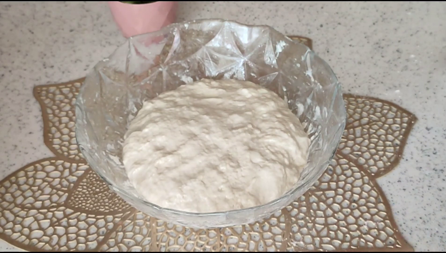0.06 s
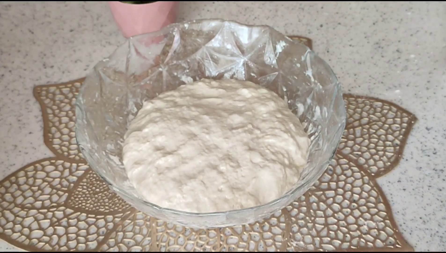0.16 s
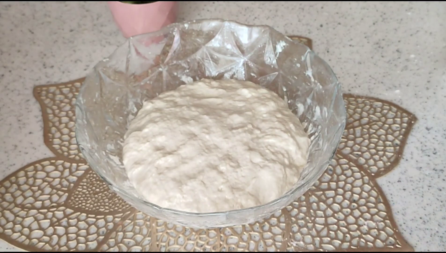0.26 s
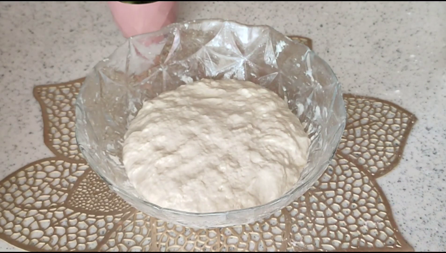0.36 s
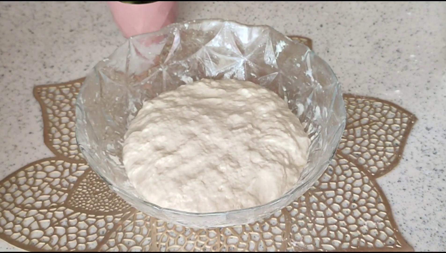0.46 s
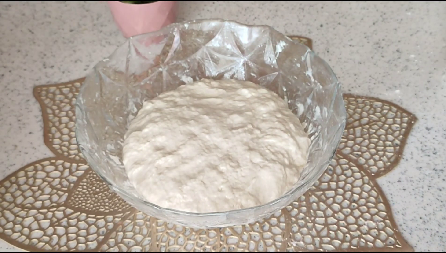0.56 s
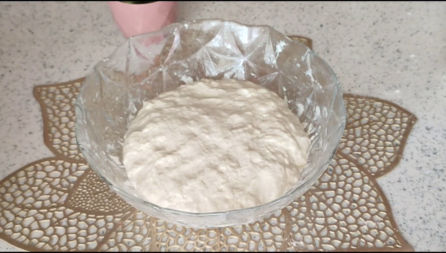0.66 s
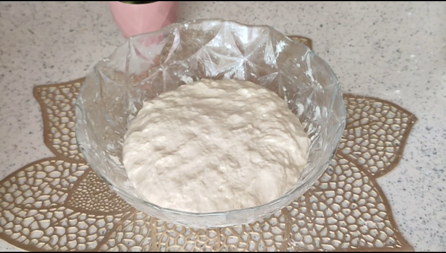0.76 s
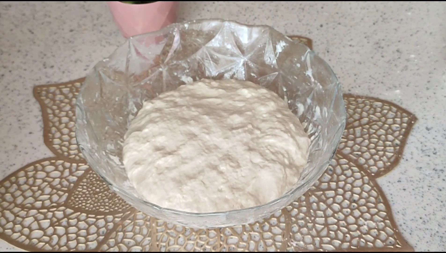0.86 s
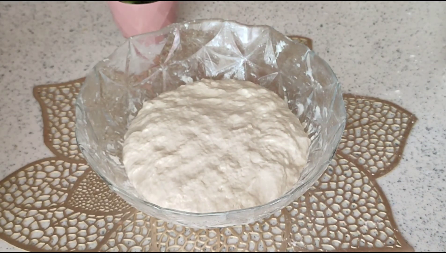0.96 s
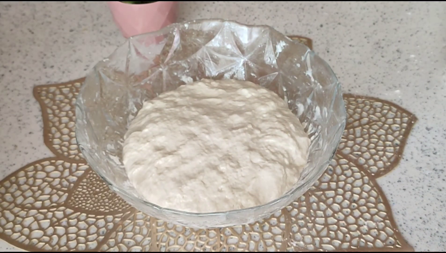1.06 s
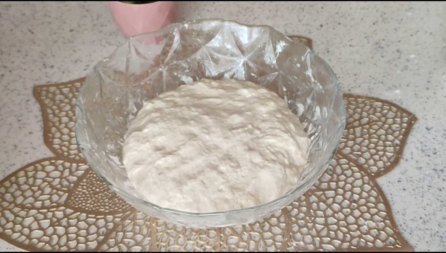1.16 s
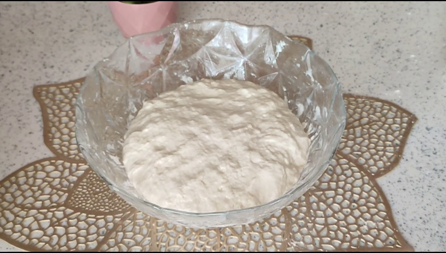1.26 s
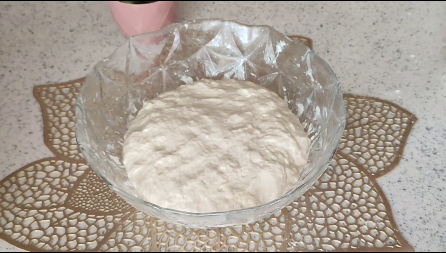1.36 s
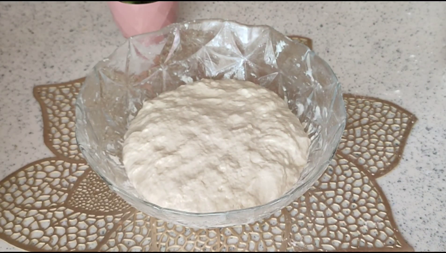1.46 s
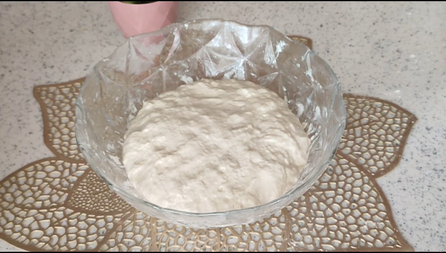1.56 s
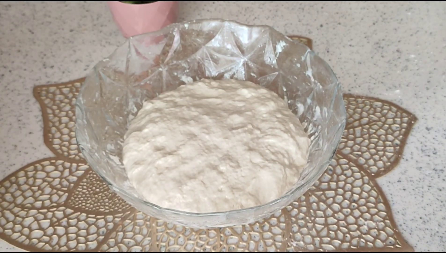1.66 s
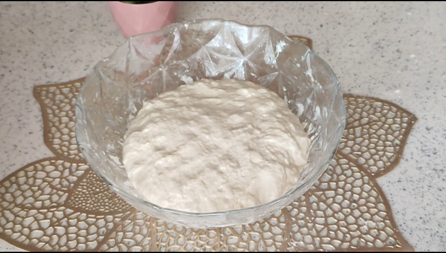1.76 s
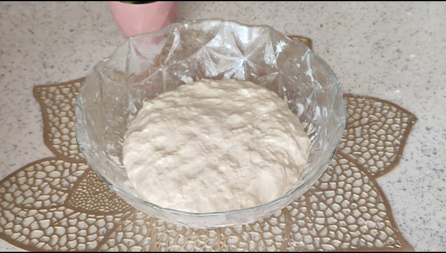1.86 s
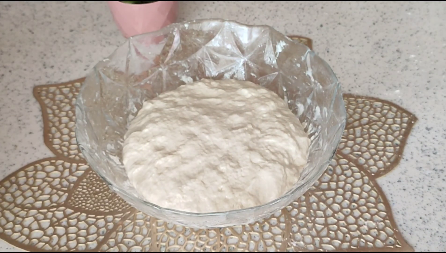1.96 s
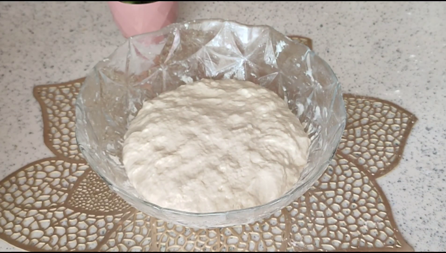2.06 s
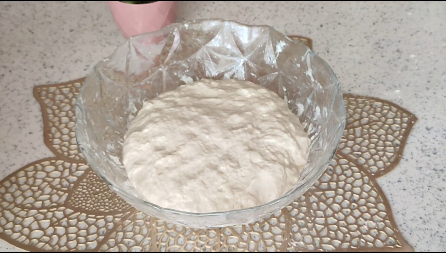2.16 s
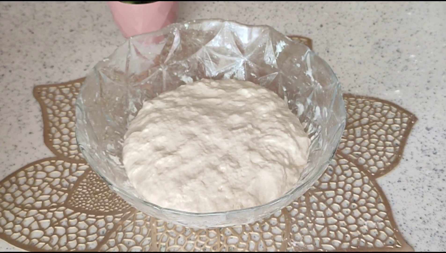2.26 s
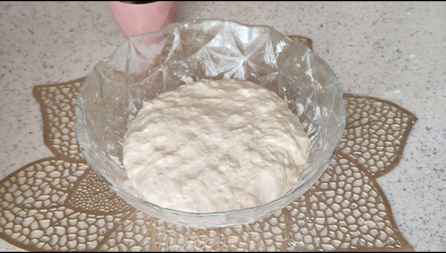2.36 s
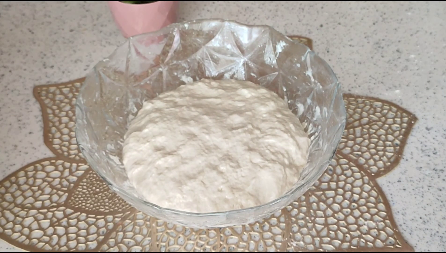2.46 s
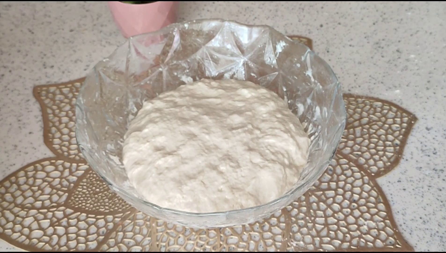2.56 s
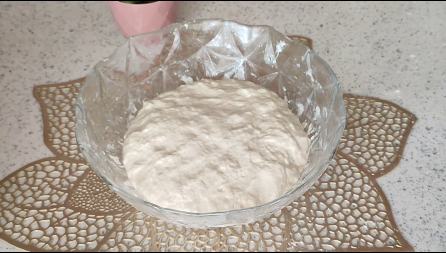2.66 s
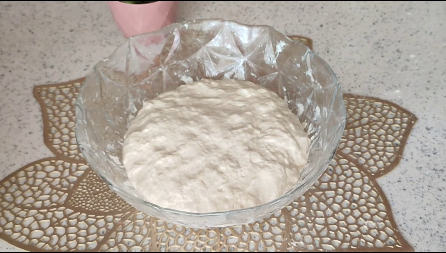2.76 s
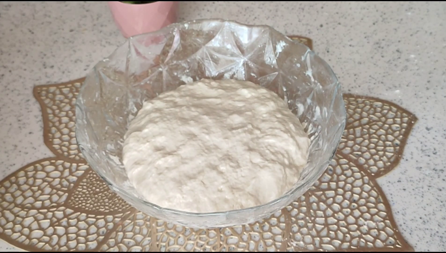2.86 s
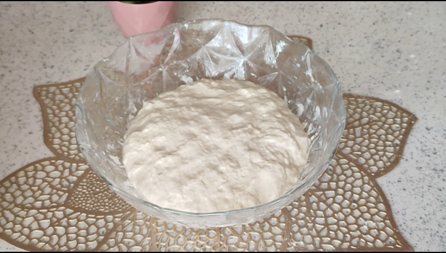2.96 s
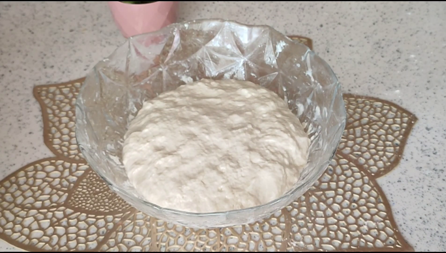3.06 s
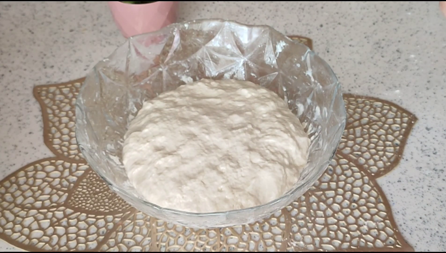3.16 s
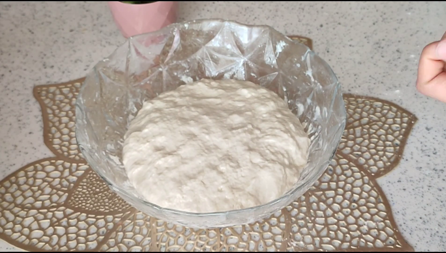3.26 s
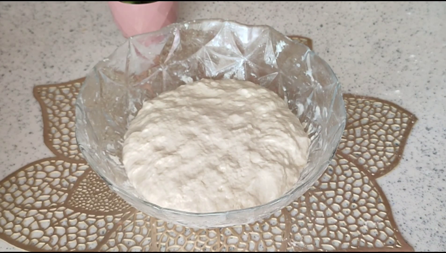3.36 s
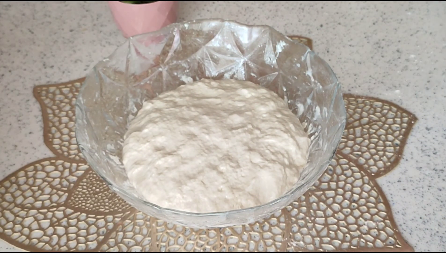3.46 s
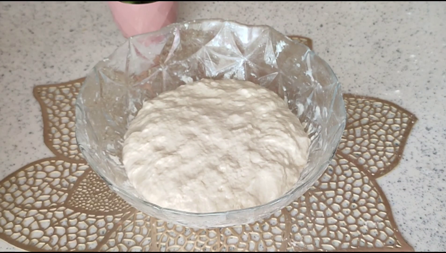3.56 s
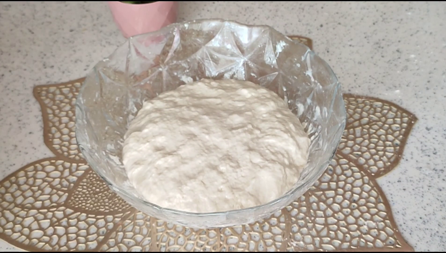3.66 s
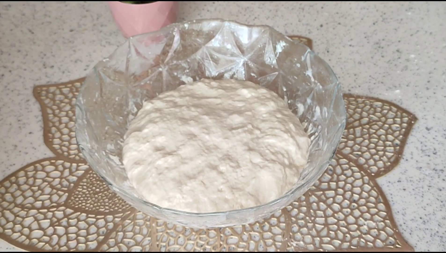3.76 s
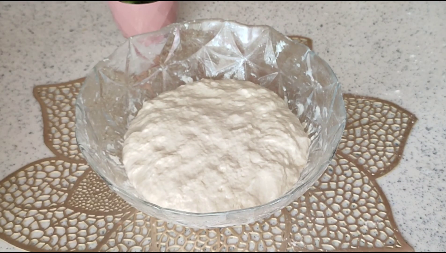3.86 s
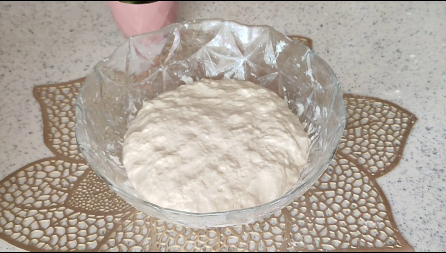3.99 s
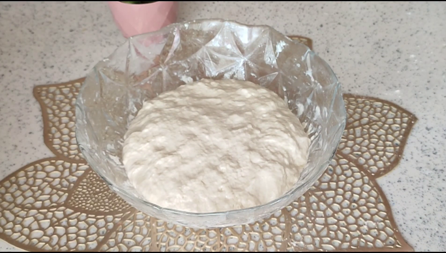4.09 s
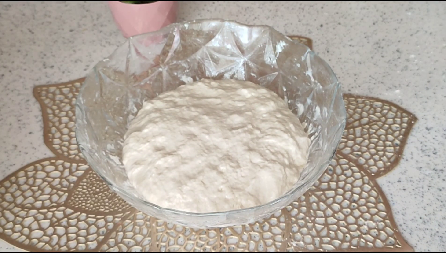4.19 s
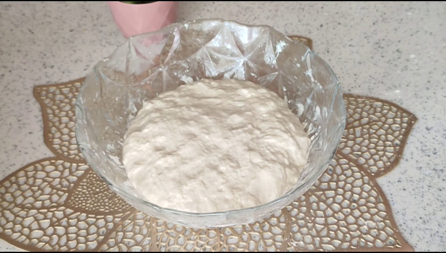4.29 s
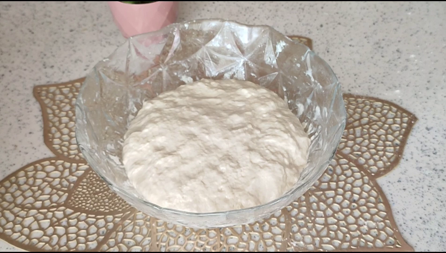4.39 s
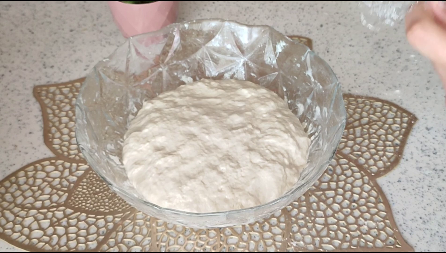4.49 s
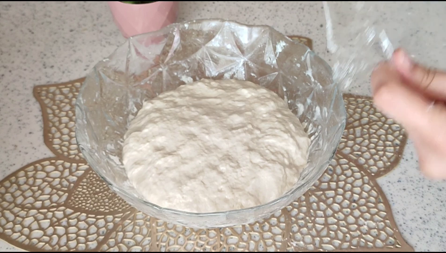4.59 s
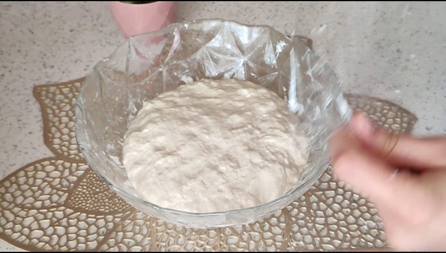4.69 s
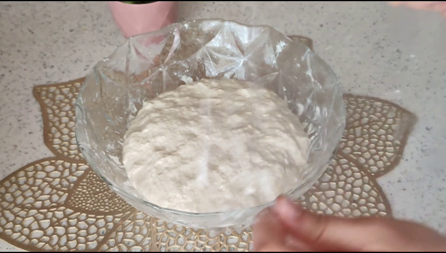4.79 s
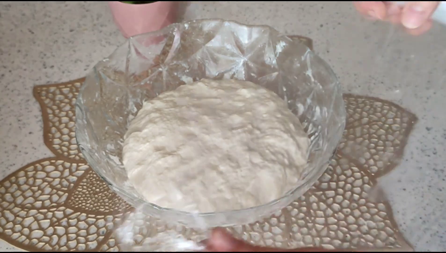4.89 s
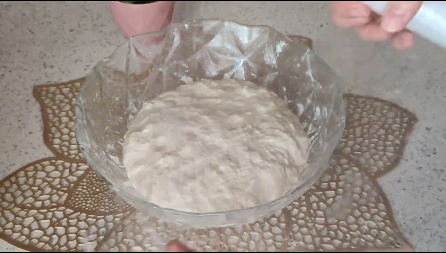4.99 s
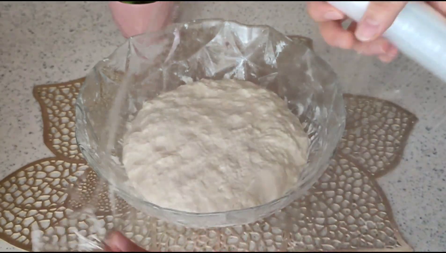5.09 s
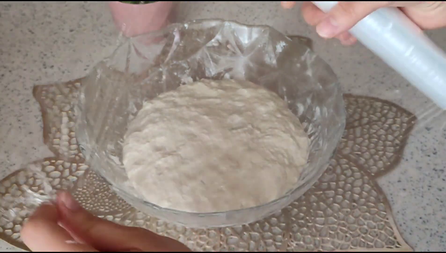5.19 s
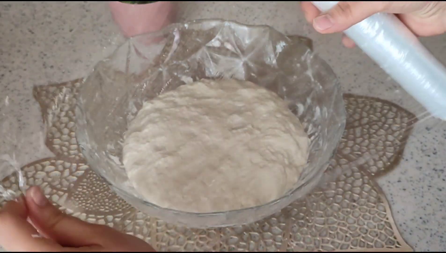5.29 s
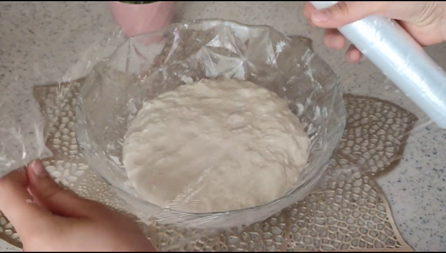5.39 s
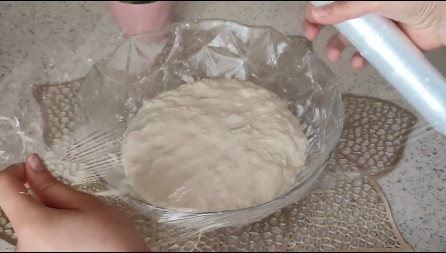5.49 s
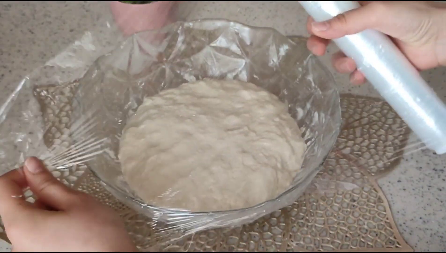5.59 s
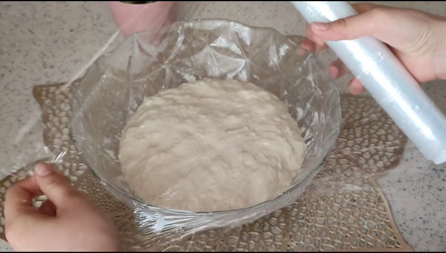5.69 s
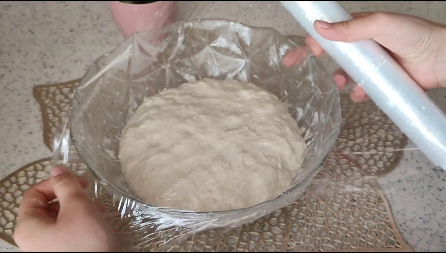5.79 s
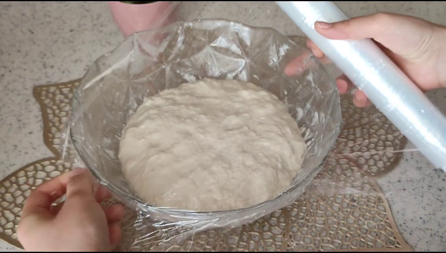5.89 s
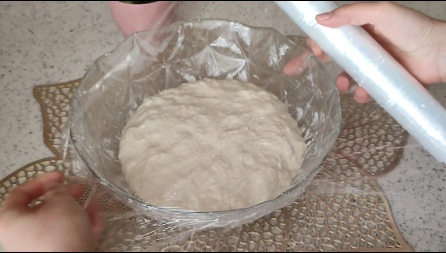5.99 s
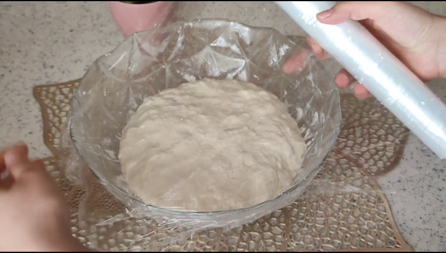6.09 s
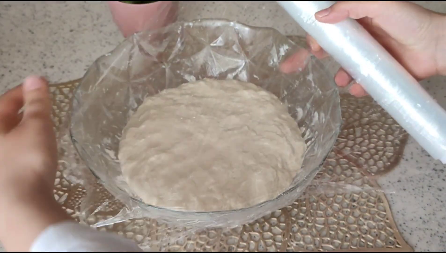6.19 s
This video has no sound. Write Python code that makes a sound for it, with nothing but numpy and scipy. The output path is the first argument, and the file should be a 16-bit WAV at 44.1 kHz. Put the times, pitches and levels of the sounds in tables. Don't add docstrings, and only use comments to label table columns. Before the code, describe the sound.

Cling film is faintly picked at, then peeled off its roll in loud crackling jerks with pops and low flaps in a quiet kitchen.

```python
import sys
import numpy as np
from scipy import signal
from scipy.io import wavfile
from scipy.ndimage import uniform_filter1d

SR = 44100
rng = np.random.default_rng(int(sys.argv[2]) if len(sys.argv) > 2 else 0)


def log_audio(samples):
    frames = np.atleast_2d(samples).T
    limited = np.clip(frames, -1, 1)
    pcm = np.round(limited * 32767).astype(np.int16)
    wavfile.write(sys.argv[1], SR, pcm)


def ratio(d):
    e = np.asarray(d, float) / 20
    return 10 ** e


N = 274962

# f/Hz, density/dB per Hz
AIR = [(8.8, -23), (15, 5), (28, -7), (48, -2.5), (70, -14.5), (104, -1), (126, -33), (167, -13.5),
       (203, -9.5), (234, -17), (499, -24), (719, -27.5), (1220, -33.5), (1760, -33), (5720, -44.5),
       (10300, -48.5), (12200, -74), (15900, -100), (22000, -120)]
# f/Hz, correlation/1
AIR_LIKENESS = [(60, 0.85), (170, 0.88), (500, 0.46), (1430, 0.14), (4130, 0.42), (11900, 0.088)]
# f/Hz, width/Hz, level/dB
HUM = [(165.1, 6.7, -64.5), (705, 19, -79)]
# f/Hz, level/dB, t60/s
BOWL = [(350, 10, .03), (900, 5, .13), (2420, 2, .11), (3400, 0, .04), (4400, 7, .1), (5650, 1, .11),
        (6800, 1, .035)]
# t/s, f/Hz, level/dB
SQUEAK = [
    (.17, 1420, -85),
    (.18, 1413, -58),
    (.2, 1464, -66),
    (.217, 1590, -59),
    (.25, 1640, -68),
    (.28, 1740, -68),
    (.31, 1770, -71),
    (.36, 1840, -78),
    (.4, 1790, -88),
]
# t/s, peak/dB, f/Hz, low knock/dB, left over right/dB
SNAPS = [(0.2925, -48.5, 3160, -7, 0.5), (0.4914, -36, 6400, -33, -7), (0.9175, -42.5, 6700, -27, -2),
         (0.9652, -41.5, 6250, -27, -5), (1.138, -46, 6820, -27, -7), (1.2006, -36, 6300, -41, -9),
         (1.252, -42, 5500, -30, -3), (1.2603, -43, 6040, -33, -5), (1.2866, -39, 5940, -30, -14),
         (1.7677, -45, 2780, -14, -5), (1.8712, -32, 7260, -18, -6), (2.0498, -56, 7460, -25, -5),
         (2.4854, -35, 4110, -14, -6), (3.0929, -50, 6900, -20, -6), (3.1224, -44, 6730, -20, -6),
         (3.143, -35, 2430, -16, -8), (3.2258, -32.5, 7900, -16, -8), (3.262, -48, 5000, -10, -5),
         (3.277, -31, 9000, -15, -7), (3.2788, -32, 4400, -16, -8), (3.3023, -28, 7180, -27, -12),
         (3.3076, -24, 7750, -13.5, -1), (3.5998, -44, 9100, -25, -5), (3.761, -50, 1780, -9, -5),
         (4.38, -22, 5000, -5, -4), (5.1355, -24, 6390, -12, -5), (5.585, -30, 4990, -5, -2),
         (5.5968, -19.5, 7400, -13, -3), (5.7718, -29, 3800, -14, 2), (5.7864, -27, 3880, -12, 10),
         (5.8194, -54, 4550, -3, -6), (5.898, -50, 3100, 3, 8), (5.919, -41.5, 4770, -4, 8),
         (6.1242, -38.5, 2520, -13, 3)]
# full swing t/s, hold/s, level/dB, f/Hz
FLAPS = [(2.523, 0.057, -38, 159.4), (4.191, 0.0085, -31.5, 133.3), (4.26, 0.07, -33.5, 113.4),
         (4.421, 0.055, -38, 128.6), (4.752, 0.013, -36.5, 194.3), (4.991, 0.026, -50, 193.6),
         (5.171, .012, -35, 169.4), (5.267, .02, -31, 161.8), (5.336, 0.068, -37.5, 155.3),
         (5.422, 0.11, -44.5, 189.4), (5.606, 0.13, -41.5, 151)]
# start t/s, hold/s, level/dB, f/Hz
DRONES = [(1.871, 0.023, -50, 945), (3.3, 0.005, -46.5, 1200), (4.248, 0.053, -38, 452),
          (4.47, 0.08, -36, 515), (4.48, 0.16, -42.5, 271.4), (4.716, 0.065, -42, 294.2),
          (4.945, 0.028, -28.5, 450), (5.136, 0.04, -39.5, 410), (5.43, 0.044, -29, 500),
          (5.425, 0.11, -39.5, 290), (5.619, 0.032, -38, 410), (2.512, 0.023, -47, 283),
          (4.09, 0.023, -34.5, 915), (4.762, 0.027, -35.5, 800), (5.62, 0.079, -44.5, 270),
          (4.77, 0.072, -46, 225), (2.53, 0.044, -50.5, 450), (4.56, 0.033, -37, 520),
          (4.405, 0.032, -37, 1150), (3.135, 0.018, -58, 2430), (5.644, 0.043, -42.5, 900),
          (5.469, 0.072, -49, 56.7), (3.3, 0.07, -50.5, 75)]
# multiple of its pitch/1, level/dB
SKIN_MODES = [(1, 0.5), (1.42, -10), (1.95, -11)]
# t/s, peak/dB, f/Hz
SLIPS = [(4.1036, -23, 907), (4.113, -18, 1146), (4.1321, -25, 1150), (4.1713, -25, 900),
         (4.2055, -20, 1150), (4.2116, -21, 1150), (4.2537, -20, 900), (4.286, -20.5, 900),
         (4.3243, -33, 700), (4.344, -22, 1150), (4.3622, -24, 1150), (4.3819, -25, 900),
         (4.4074, -24.5, 900), (4.4114, -24, 897), (4.415, -23.5, 900), (4.5215, -20, 540),
         (4.5954, -14, 900), (4.6029, -16.5, 700), (4.6339, -32, 544), (4.6605, -24, 900),
         (4.6658, -20, 700), (4.7113, -28, 550), (4.949, -22, 550), (4.9594, -25, 550), (4.9635, -20, 550),
         (4.9674, -22, 550), (4.972, -19.5, 545), (4.9765, -23, 550), (5.0107, -18, 700),
         (5.0162, -21, 550), (5.142, -25, 549.6), (5.178, -22, 1160), (5.2123, -30, 700),
         (5.2624, -25, 550), (5.2803, -20.5, 550), (5.325, -20, 700), (5.331, -23, 700), (5.3371, -22, 550),
         (5.3597, -21, 700), (5.3678, -23, 700), (5.3742, -20, 900), (5.405, -22, 697), (5.4152, -21, 550),
         (5.4398, -18.5, 555.5), (5.4455, -17, 550), (5.4495, -20, 550), (5.4569, -21, 704),
         (5.4613, -16, 547), (5.4656, -17, 690), (5.4731, -20, 553), (5.4849, -21, 550), (5.4926, -21, 700),
         (5.4967, -25, 550), (5.5026, -24, 550), (5.6232, -22, 550), (5.6403, -24, 700), (5.65, -16, 700),
         (5.6675, -18, 904), (5.6853, -19, 700), (5.6899, -20, 900)]
# start t/s, rise/s, hold/s, level/dB, slack (pops of the free sheet)/dB
PICKING = [(1.13, 0.0073, 0.011, -64.5, -22), (1.278, 0.0057, .003, -74, -21), (1.5, .06, 0.13, -72.5, -3),
           (1.735, 0.043, .005, -57.5, -4), (1.838, 0.047, 0.01, -47, -6.5),
           (1.95, 0.022, 0.15, -64.5, -11), (2.12, 0.36, 0.24, -57, -4.5), (2.506, 0.027, 0.003, -29.5, -6),
           (2.6, .025, 0.093, -63, 1), (2.93, 0.22, .04, -65.5, -14), (3.075, 0.072, 0.021, -51, -9),
           (3.16, 0.032, 0.037, -60.5, -3), (3.272, 0.027, 0.008, -49.5, -12),
           (3.43, 0.074, 0.0084, -63, -24), (3.55, 0.063, 0.017, -62.5, -17), (3.72, 0.041, .01, -59, -23),
           (3.77, .035, .19, -64.5, -16)]
# start t/s, rise/s, hold/s, level/dB, slack (pops of the free sheet)/dB
PULLS = [(4.049, 0.022, 0.0095, -38.5, -1.5), (4.08, 0.04, 0.034, -30.5, -6.5),
         (4.165, 0.011, .06, -30.5, -2.5), (4.22, 0.03, 0.067, -30, -5.5), (4.32, 0.0089, 0.04, -35.5, -5),
         (4.379, 0.0044, 0.1, -31.5, -5), (4.455, 0.018, 0.1, -30.5, 1.5), (4.572, 0.014, 0.087, -31, -.5),
         (4.69, 0.013, 0.051, -42.5, 3), (4.737, 0.011, 0.072, -37.5, 2), (4.83, 0.0067, 0.024, -40, 2),
         (4.87, .01, 0.031, -51, 11), (4.899, .002, 0.0077, -42, 1), (4.934, 0.017, .005, -37, 4),
         (4.955, 0.023, 0.039, -32.5, 1), (5.0, .026, 0.03, -32.5, 1), (5.07, 0.01, 0.034, -51, 1),
         (5.1, .01, .025, -50, 0), (5.135, 0.0011, 0.017, -31, 0.5), (5.145, .01, 0.055, -31.5, -1.5),
         (5.243, 0.0094, 0.023, -32, 0.5), (5.268, 0.011, 0.011, -33, -1), (5.32, 0.0039, 0.062, -31, 0),
         (5.385, 0.021, 0.039, -28.5, -5), (5.44, 0.014, 0.042, -30.5, 1), (5.49, 0.008, 0.051, -31, -5),
         (5.56, .01, .025, -46, 1), (5.597, 0.0027, .035, -34.5, 3.5), (5.63, 0.014, 0.028, -32.5, 3),
         (5.67, .01, 0.032, -35, 3.5), (5.72, .005, 0.012, -44, 3.5), (5.745, 0.032, 0.016, -48, 2.5),
         (5.8, .01, 0.024, -58.5, 7), (5.87, 0.046, .01, -59.5, 4), (5.95, 0.013, 0.1, -69, 5.5),
         (6.07, 0.027, 0.078, -68, -2)]
# t/s, free sheet f/Hz, peel line f/Hz, tack f/Hz, coarseness of the peel/dB
TENSION = [(1.78, 586, 2540, 6630, 1.5), (1.89, 940, 2350, 7350, -2.5), (2.4, 605, 2110, 7500, -0.5),
           (2.52, 725, 2510, 4840, 0.5), (3.14, 620, 2440, 6500, -1), (3.3, 806, 2300, 7750, 1),
           (3.9, 550, 2080, 7830, 0), (4.06, 1010, 2020, 5130, 4.5), (4.27, 720, 1590, 7000, -1),
           (4.4, 780, 1350, 6100, 1), (4.58, 573, 1520, 7020, 0.5), (4.82, 745, 1600, 6050, 3),
           (4.95, 500, 1600, 6800, 1), (5.15, 566, 1654, 5850, -4.5), (5.28, 563, 2285, 6200, -3.5),
           (5.43, 560, 2300, 5500, -4.5), (5.66, 845, 1250, 6450, -0.5), (6.0, 400, 1880, 4980, 0.5)]
# f/Hz, density/dB per Hz
CRACKLE = [(590, -33), (1000, -3), (1050, -12), (1240, -2), (3070, -5), (4500, -13.5), (5850, -39),
           (9900, -120)]
# f/Hz, density/dB per Hz
HISS = [(3700, -7), (5450, -13.5), (7200, -8.5), (8800, -12.5), (10300, -13), (11800, -56)]
# t/s, lag of the left microphone/ms
LEFT_LAG = [(0, -0.039), (3, 0.19), (4.5, 0.16), (5.2, 0), (6.3, -0.034)]

LET_GO_DB_PER_S, PICK_LET_GO_DB_PER_S = 754, 349


def sos(x, hz, kind, order=2):
    return signal.sosfilt(signal.butter(order, hz, kind, fs=SR, output="sos"), x)


def rms_one(x):
    return x / np.sqrt(np.mean(x ** 2) + 1e-20)


def in_time(points):
    s, *columns = np.transpose(points)
    return [np.interp(np.arange(N) / SR, s, c) for c in columns]


def while_on(points):
    t = np.arange(N) / SR
    on = (t >= points[0][0]) & (t < points[-1][0])
    return uniform_filter1d(on * 1., size=400)


def at_hz(points, hz):
    return np.interp(np.log(hz), np.log(np.array(points)[:, 0]), np.array(points)[:, 1])


def near(hz, centre_hz, fall_db, least_db):
    return ratio(np.maximum(-fall_db * np.log2(hz / centre_hz) ** 2, least_db))


def side(right_db):
    return ratio([[-right_db], [right_db]])


def drift(rate):
    r = np.exp(-64 * np.pi * rate / SR)
    slow = signal.lfilter([1], [1, -2 * r, r * r], rng.standard_normal(N // 32 + 1502))[1500:]
    return np.interp(np.arange(N) / 32, np.arange(len(slow)), rms_one(slow))


def ring(clicks, hz, t60):
    r, w = ratio(-60 / (t60 * SR)), 2 * np.pi * hz / SR
    return signal.lfilter([0, np.sin(w)], [1, -2 * r * np.cos(w), r * r], clicks + 1e-18)


def crease(clicks, hz, cycles):
    return ring(ring(clicks, hz, cycles / hz), hz, cycles / hz)


def grains(per_s, uneven_db, patchy_db, pitches, cycles, gains, spread_ms):
    draw = rng.random((N, 5))
    at = np.flatnonzero(draw[:, 0] < per_s / SR)
    draw = draw[at]
    size = ratio(uneven_db * np.minimum(-np.log(draw[:, 1]), 4)) * np.sign(draw[:, 2] - .5)
    spot = 2 * draw[:, 3] - 1
    lag = np.round(spot * spread_ms * SR / 2000).astype(int)
    dealt = (draw[:, 4] * len(pitches)).astype(int)
    out = 0
    for k, hz in enumerate(pitches):
        mine = dealt == k
        clicks = np.zeros((2, N))
        patch = ratio(patchy_db * drift(7.4))
        strength = size[mine] * (gains(hz) * patch)[at[mine]]
        strength /= np.linalg.norm(crease(np.eye(1, 3000)[0], hz, cycles))
        np.add.at(clicks[0], np.clip(at + lag, 0, N - 1)[mine], strength * ratio(-3 * spot[mine]))
        np.add.at(clicks[1], np.clip(at - lag, 0, N - 1)[mine], strength * ratio(3.1 * spot[mine]))
        out = out + crease(clicks, hz, cycles)
    steady = np.sqrt(uniform_filter1d(np.mean(out ** 2, axis=0), size=2200) + 1e-12)
    return rms_one(out / steady)


def air():
    out, edges = 0, 12 * 2 ** np.arange(0, 10.6, .5)
    white = rng.standard_normal((2, 2, N))
    for k, (low, high) in enumerate(zip(edges, edges[1:])):
        common, opposed = sos(white[k % 2], [low, high], "band")
        hz = np.sqrt(low * high)
        alike = np.clip(at_hz(AIR_LIKENESS, hz), -1, 1)
        band = np.sqrt(1 + alike) * common + np.sqrt(1 - alike) * opposed * [[1], [-1]]
        out = out + ratio(at_hz(AIR, hz)) * band
    return ratio(-53) * rms_one(out)


def refrigerator():
    hum = sum(ratio(db) * rms_one(ring(rng.standard_normal(N), hz, 2.0 / width)) for hz, width, db in HUM)
    mains_hz, mains_db = 101.1, -55.5
    level = ratio(mains_db + 2.6 * drift(4.2))
    return hum + level * np.sin(2 * np.pi * mains_hz * np.arange(N) / SR + 0.37 * drift(5.6))


def kitchen(x):
    t60_s, level_db = 0.32, -5.5
    t = np.arange(SR // 2) / SR
    shared, left, right = rng.standard_normal((3, len(t)))
    tail = sos(shared, 530, "low") + sos(np.array([left, right]), 740, "high")
    dull = sos(tail, 4200, "low")
    tail = dull * ratio(-60 * t / t60_s) + (tail - dull) * ratio(-60 * t / (0.59 * t60_s))
    tail *= np.clip((t - .003) / 0.00024, 0, 1)
    tail /= np.sqrt(np.sum(tail ** 2) / 2)
    return ratio(level_db) * signal.fftconvolve(x, tail, axes=1)[:, :N]


def bowl():
    tap_s, tap_db = 5.9545, -61
    click = np.zeros(N)
    click[round(tap_s * SR)] = ratio(tap_db)
    return ratio(31) * click + sum(ratio(db) * ring(click, hz, t60) for hz, db, t60 in BOWL)


def squeak():
    hz, level_db = in_time(SQUEAK)
    turn = 2 * np.pi * np.cumsum(hz * (1 + 0.041 * drift(200))) / SR
    patch = rms_one(sos(rng.standard_normal(N), [2850, 3600], "band"))
    patch *= np.clip((1720 - hz) / 80, 0, 1)
    level = while_on(SQUEAK) * ratio(level_db + 2.0 * drift(60))
    return level * (np.sin(turn) + ratio(-13.0) * patch)


def snaps():
    size = 2000
    out, t, click = np.zeros((2, N + size)), np.arange(size) / SR, np.eye(1, size)[0]
    for s, peak_db, hz, low_db, pan_db in SNAPS:
        after = rng.standard_normal((2, size)) * ratio(-18.5) * np.exp(-((t - .009) / 0.0017) ** 2)
        burst = np.sign(rng.standard_normal(size)) * np.exp(-t / 0.0011)
        crack = ratio(-3.5) * ring(click, hz, 0.0032) + ratio(-8.5) * sos(burst, [1500, 10500], "band")
        knock = ring(click, 1390, .016)
        sound = crack + ratio(low_db) * knock + sos(after, [.5 * hz, 11000], "band")
        i = round(s * SR)
        out[:, i:i + size] += ratio(peak_db) * side(-pan_db / 2) * sound
    return out[:, :N]


def flaps():
    up_db_per_s, down_db_per_s = 403, 348
    t = np.arange(N) / SR
    swing = 0
    for full_s, hold, db, _ in FLAPS:
        before, after = np.clip(full_s - t, 0, 1), np.clip(t - full_s - hold, 0, 1)
        swing = swing + ratio(db - up_db_per_s * before - down_db_per_s * after)
    s, hold, _, hz = np.transpose(FLAPS)
    turn = 2 * np.pi * np.cumsum(np.interp(t, s + hold / 2, hz) * (1 + 0.0684 * drift(27.5))) / SR
    return swing * ratio(-6.5 + 5.4 * drift(61)) * np.sin(turn)


def drones():
    rise_s, cycles = 0.0076, 44
    out, t = np.zeros(N), np.arange(SR // 2) / SR
    for s, hold, db, hz in DRONES:
        shake = rng.standard_normal(2 * len(t))
        modes = sum(ratio(mode_db) * rms_one(crease(shake, k * hz, cycles)) for k, mode_db in SKIN_MODES)
        tone = modes[len(t):]
        lasts = round((rise_s + hold) * SR) + 400
        tone = tone / np.sqrt(np.mean(tone[:lasts] ** 2))
        fade_db = LET_GO_DB_PER_S * np.clip(t - rise_s - hold, 0, 1)
        out[round(s * SR):][:len(t)] += np.clip(t / rise_s, 0, 1) * ratio(db - fade_db) * tone
    return out * ratio([[-4.0], [2.5]])


def sheet(pops, sheet_hz, jerks):
    def weight(hz):
        too_low = np.clip(np.log2(0.77 * sheet_hz / hz), 0, 1)
        return near(hz, sheet_hz, 9.3, -3.5) * ratio(-22 * too_low)

    pop = grains(1100 * jerks, 2.3, 3.0, np.geomspace(230, 1200, 13), 8.5, weight, spread_ms=.25)
    kicks = grains(220 * jerks, 2.5, 1.5, np.geomspace(450, 900, 3), 3.5, weight, spread_ms=.15)
    return pops * sos(ratio(-5.0) * pop + ratio(-6.5) * kicks, 190, "high") * side(0.95)


def slips():
    level_db, rebound_db, crack_db = -1, -6, -12.5
    lead = 150
    out, t = np.zeros((2, N)), np.arange(-lead, 250) / SR

    def cycle(turn):
        return -turn * np.exp(.5 - turn ** 2 / 2)

    for (s, db, hz), tear in zip(SLIPS, rng.standard_normal((len(SLIPS), len(t)))):
        push = cycle(2 * np.pi * hz * t)
        rebound = ratio(rebound_db) * cycle(2 * np.pi * (hz * t - 1.1))
        crack = ratio(crack_db) * np.diff(tear, prepend=0) * np.exp(-(t / .0003) ** 2)
        i = round(s * SR) - lead
        out[:, i:i + len(t)] += ratio(db + level_db) * (push + crack + rebound * [[0], [1]])
    return out * side(1)


def strokes(rows, below_db, fall_db_per_s, offset_db):
    t, power = np.arange(SR // 2) / SR, np.zeros(N + SR)
    for (s, rise, hold, db, _), extra_db in zip(rows, offset_db):
        rise_db = -below_db * np.clip(1 - t / rise, 0, 1)
        fall_db = -fall_db_per_s * np.clip(t - rise - hold, 0, 1)
        power[round(s * SR):][:len(t)] += ratio(2 * (db + extra_db + rise_db + fall_db))
    return np.sqrt(power[:N])


def hand():
    sheet_hz, crackle_hz, hiss_hz, coarseness_db = in_time(TENSION)
    hiss = crackle = pops = 0
    # strokes, start below full strength/dB, let-go/dB per s, crackle against hiss/dB
    for rows, below_db, fall, crackle_db in ((PULLS, 6.5, LET_GO_DB_PER_S, -1),
                                             (PICKING, 11.5, PICK_LET_GO_DB_PER_S, -1.5)):
        db, slack_db = np.array(rows)[:, 3:].T
        coarse_db = crackle_db + 0.17 * slack_db + 0.11 * (db + 47)
        hiss = hiss + strokes(rows, below_db, fall, 0 * db)
        crackle = crackle + strokes(rows, 0.9 * below_db, fall, coarse_db)
        pops = pops + strokes(rows, 0.56 * below_db, 0.86 * fall, slack_db)
    return (hiss, crackle * ratio(coarseness_db), pops), (hiss_hz, crackle_hz, sheet_hz)


def tack(hiss, crackle, hiss_hz, crackle_hz, jerks):
    def shine(hz):
        return ratio(at_hz(HISS, hz)) * hz ** .5 * near(hz, hiss_hz, 8, -5.0)

    def colour(hz):
        return ratio(at_hz(CRACKLE, hz)) * hz ** .5 * near(hz, crackle_hz, 19, -2.7)

    fine = grains(12000 * jerks, 3.2, 2.6, np.geomspace(3800, 11300, 12), 7.0, shine, spread_ms=.2)
    coarse = grains(4500 * jerks, 3.3, 2.6, np.geomspace(1100, 3800, 13), 9.0, colour, spread_ms=.12)
    return hiss * ratio(0.5) * fine * side(1.4) + crackle * ratio(-0.5) * coarse * side(0.3)


def scene():
    (hiss, crackle, pops), (hiss_hz, crackle_hz, sheet_hz) = hand()
    jerks = ratio(3.2 * drift(70))
    film = tack(hiss, crackle, hiss_hz, crackle_hz, jerks) + sheet(pops, sheet_hz, jerks)
    film = film + snaps() + squeak() + bowl()
    jumps = slips()
    wet = kitchen(sos(film + ratio(1.0) * jumps, 258, "high"))
    lag = np.round(in_time(LEFT_LAG)[0] * SR / 1000).astype(int)
    left = film[0, np.clip(np.arange(N) - lag, 0, N - 1)]
    direct = np.array([left, film[1]]) + jumps + flaps() + drones()
    return direct + wet + air() + refrigerator()


def band_limit(x):
    return signal.sosfilt(signal.butter(12, 12510, fs=SR, output="sos"), x)


def record(dry):
    cut = signal.sosfilt(signal.ellip(10, .2, 70, 11400, fs=SR, output="sos"), dry)
    return band_limit(cut)


dry = scene()
out = record(dry)
log_audio(out)
```